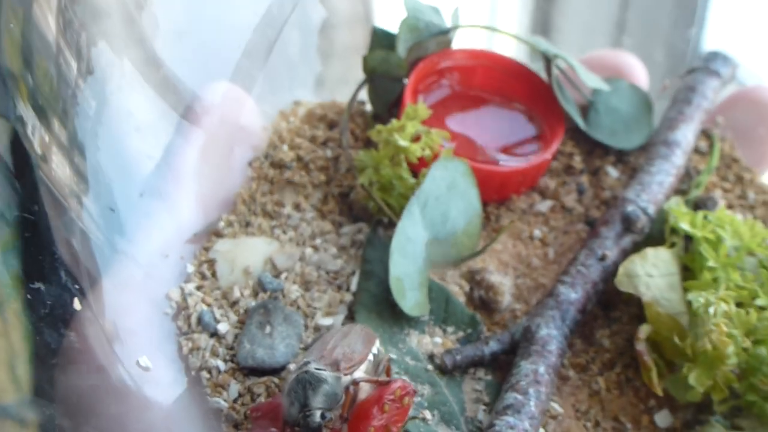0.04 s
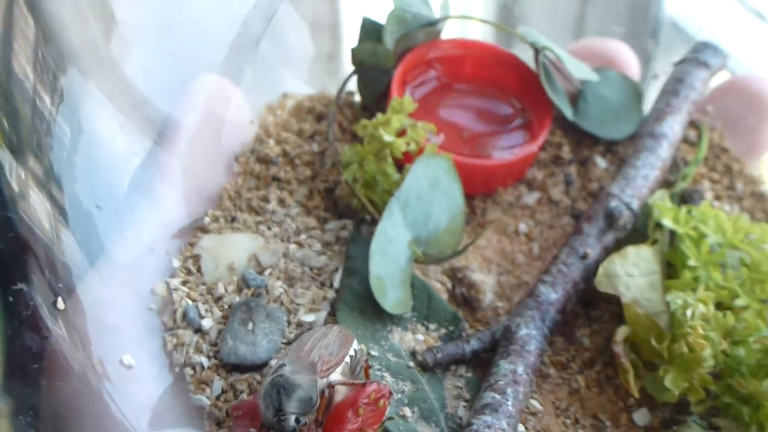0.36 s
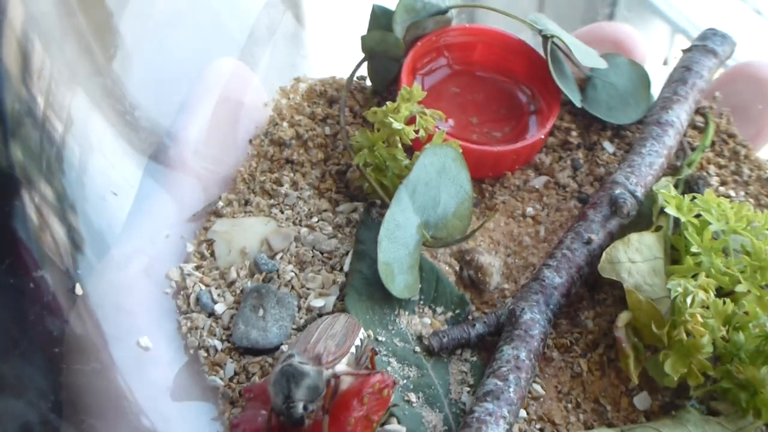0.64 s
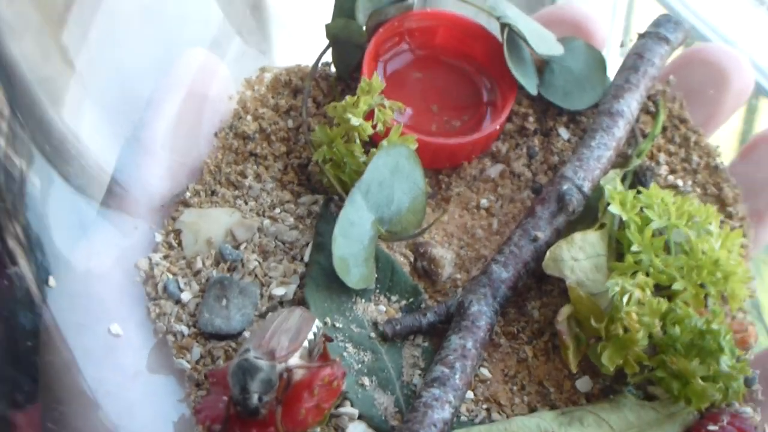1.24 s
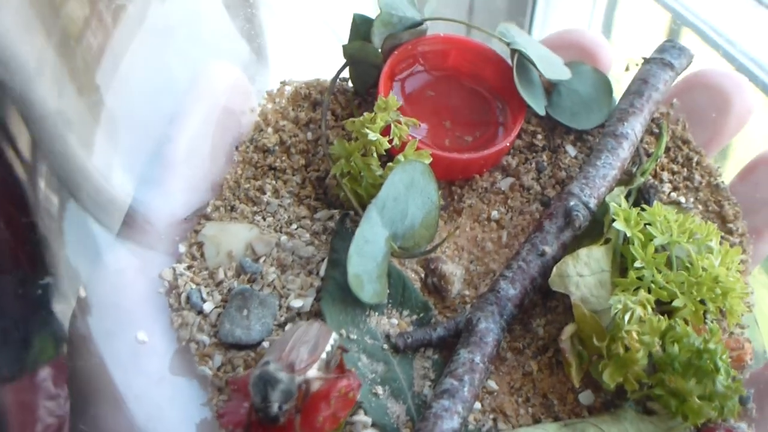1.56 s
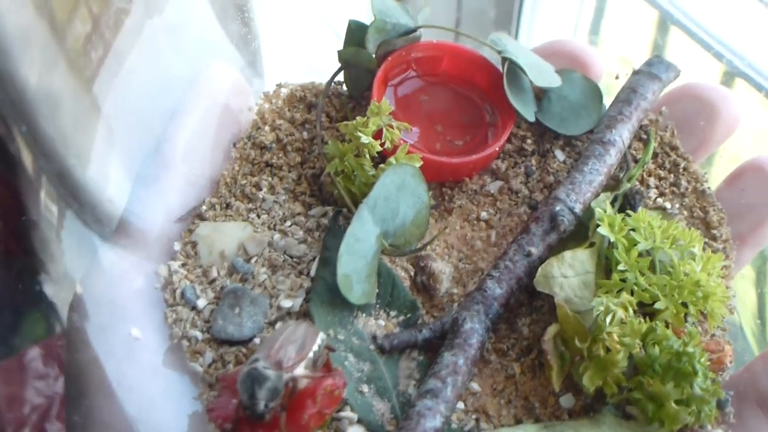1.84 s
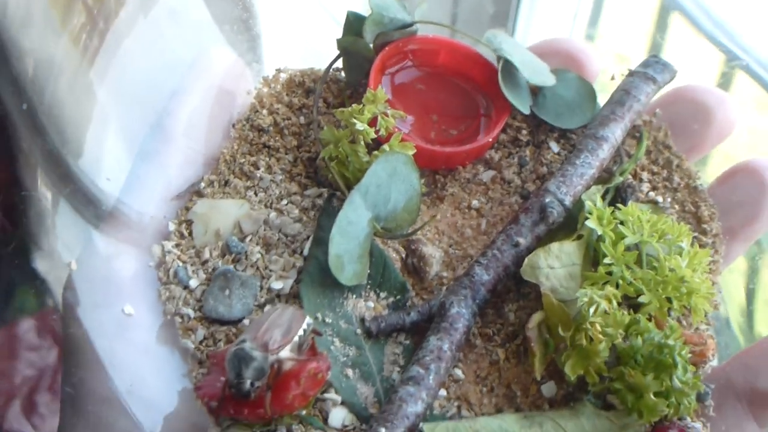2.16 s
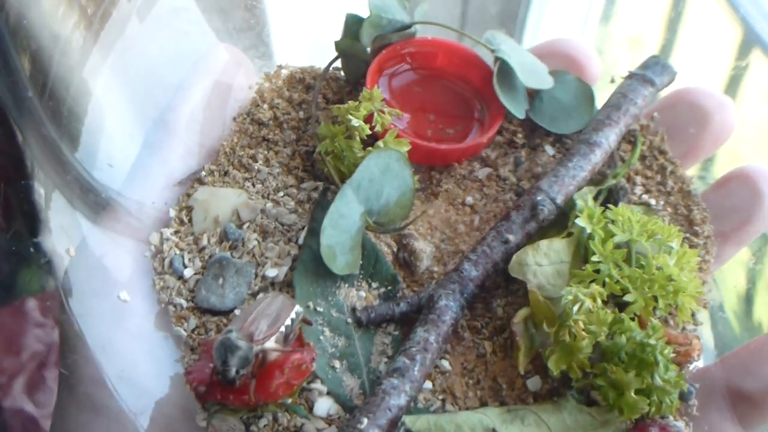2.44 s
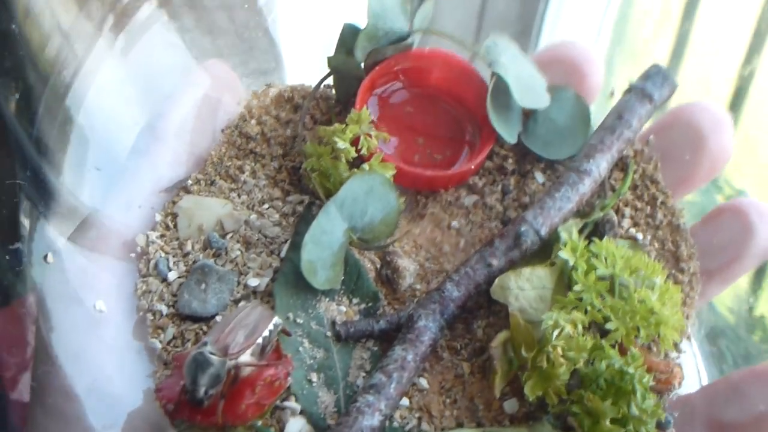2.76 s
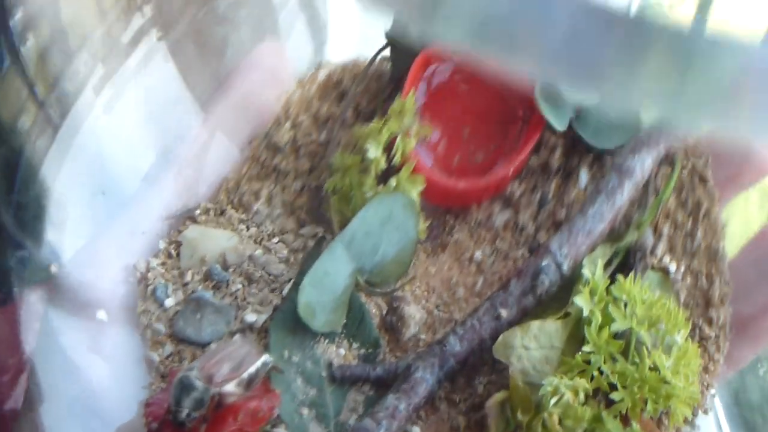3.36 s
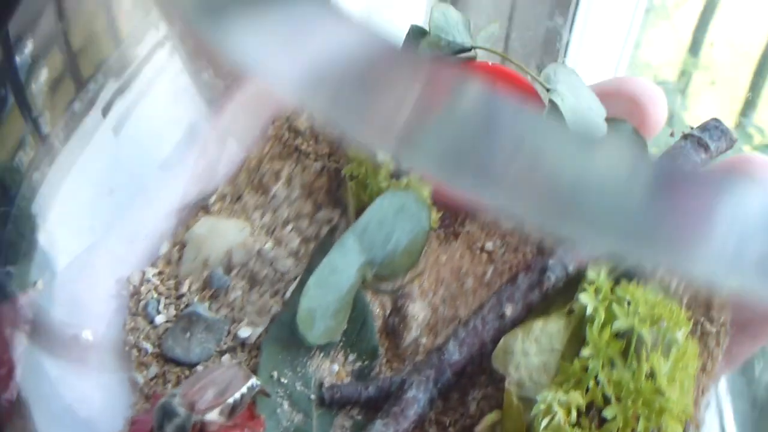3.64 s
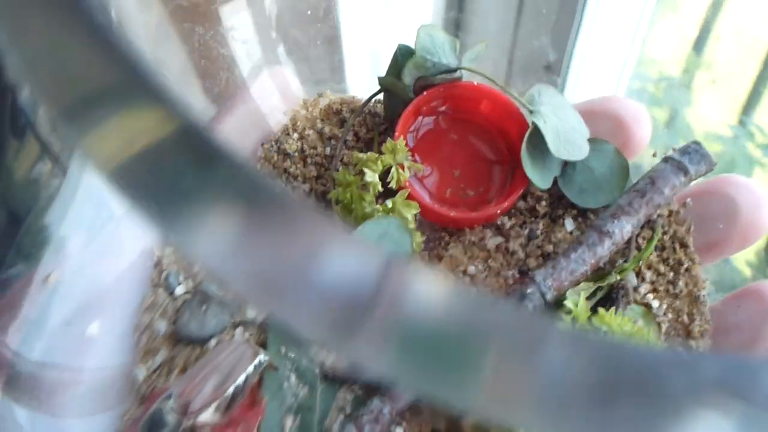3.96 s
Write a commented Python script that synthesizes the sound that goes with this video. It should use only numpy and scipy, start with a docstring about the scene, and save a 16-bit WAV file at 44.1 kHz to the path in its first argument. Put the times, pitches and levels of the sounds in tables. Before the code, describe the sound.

A small bird gives a thin pulsing whistle, pauses, then makes two raspy chips and a louder run of six falling notes. The calls echo slightly in a small room, over a low rumble and soft hiss.

```python
"""A small bird calls with both sides of its voice box at once, in the echo of a small room by a window.
Each side is a gliding, fluttering sine. It gives one pulsing whistle, two raspy chips, each followed
by a thin slurred note, then a run of six falling notes. A hand-held glass jar, knocked once lightly,
rings in quickly damped modes. There is one tiny tick; a low rumble, soft hiss and faint hum lie beneath."""
import sys
import numpy as np
from scipy import signal
from scipy.fft import rfft, irfft
from scipy.io import wavfile

SR = 44100
rng = np.random.default_rng(int(sys.argv[2]) if len(sys.argv) > 2 else 0)


def int16_out(signal):
    """Quantize to a 16-bit WAV file."""
    q = np.round(np.clip(np.atleast_2d(signal).T, -1, 1) * 32767)
    wavfile.write(sys.argv[1], SR, q.astype(np.int16))


N = 176400
T = np.arange(N) / SR

# Whistle pulses. Each row: start in seconds, length in seconds, low voice in Hz, its relative level
# in dB, high voice in Hz, its relative level in dB.
WHISTLE_PULSES = [(-0.02, 0.07, 3180, -45.5, 4800, -46.5), (0.066, 0.058, 3195, -41.5, 4795, -48.5),
                  (0.146, 0.06, 3185, -46, 4800, -48), (0.215, 0.075, 3185, -49, 4805, -50.5)]
# Raspy chips. Each row: as in WHISTLE_PULSES.
CHIP_NOTES = [(2.72, 0.052, 3760, -38.5, 5020, -52.5), (2.967, 0.056, 3740, -43, 5000, -54)]
# Slurs, the low voice sinking. Each row: as in WHISTLE_PULSES.
SLUR_NOTES = [(2.803, 0.095, 2475, -51.5, 6440, -61), (3.015, 0.10, 2475, -49, 6460, -58)]
# Near-level tone pairs ending the slurs. Each row: as in WHISTLE_PULSES.
PAIR_NOTES = [(2.822, 0.098, 4265, -48.5, 4600, -53.5), (3.042, 0.092, 4260, -48, 4620, -53)]
# Closing run, the voices drawing apart in each note. Each row: as in WHISTLE_PULSES.
RUN_NOTES = [(3.164, 0.094, 3625, -30.5, 5200, -46), (3.274, 0.084, 3556, -31, 5250, -48),
             (3.394, 0.093, 3485, -33.5, 5314, -48.5), (3.507, 0.087, 3495, -32.5, 5320, -49.5),
             (3.647, 0.0847, 3480, -32.5, 5390, -50), (3.767, 0.081, 3471, -32, 5384, -50)]
# Tone colour of the closing run, a little softer near 3750 Hz. Each row: frequency in Hz, gain in dB.
RUN_COLOUR = [(3000, 1), (3290, 0), (3400, 0.5), (3750, -5.5), (4050, -2), (4800, -3), (14000, -0.5)]


def bird():
    """The whole phrase, each kind of note with its own glide and roughness."""
    whistle = voice_box(WHISTLE_PULSES, attack=(0.25, 0.6), release=0.35, fall=0.008, rise=0.002,
                        waver=(0.008, 0.009), waver_hz=80, rasp=0.019, flutter_db=2.8, overtone_db=-29)
    chips = voice_box(CHIP_NOTES, attack=(0.35, 0.32), release=0.55, fall=-0.012, rise=0.007,
                      waver=(0.046, 0.04), waver_hz=200, rasp=0.026, flutter_db=-2, overtone_db=-19)
    slurs = voice_box(SLUR_NOTES, attack=(0.5, 0.68), release=0.35, fall=0.21, rise=0.014, bend=0.45,
                      waver=(0.018, 0.008), waver_hz=200, rasp=0.023, flutter_db=7, overtone_db=-20)
    pairs = voice_box(PAIR_NOTES, attack=(0.4, 0.42), release=0.25, fall=0.007, rise=0.01,
                      waver=(0.004, 0.007), waver_hz=120, rasp=0.017, flutter_db=-2, overtone_db=-35)
    run = voice_box(RUN_NOTES, attack=(0.2, 0.11), release=0.39, fall=0.108, rise=0.05, bend=1.8,
                    waver=(0.007, 0.01), waver_hz=130, rasp=0.001, flutter_db=3.5, overtone_db=-18.5)
    return whistle + chips + slurs + pairs + coloured(run, RUN_COLOUR)


def voice_box(notes, attack, release, fall, rise, waver, waver_hz, rasp, flutter_db, overtone_db, bend=1):
    """Two gliding sines a note, mixing into a faint overtone. attack and waver are (low, high) pairs.
    attack and release are shares of the note; fall, rise, waver and rasp are shares of the pitch."""
    out = np.zeros(N)
    low_wobble = waver[0] * drift(waver_hz) + rasp * drift(570)
    high_wobble = waver[1] * drift(waver_hz)
    low_flutter = unit_rms(from_db(flutter_db * drift(95)))
    high_flutter = unit_rms(from_db(flutter_db * drift(95)))
    for start_s, length_s, low_hz, low_db, high_hz, high_db in notes:
        progress = (T - start_s) / length_s
        on = (progress > 0) & (progress < 1)
        progress = progress[on]
        low_glide = 1 - fall * (progress ** bend - 0.5 ** bend)
        high_glide = 1 + rise * (progress - 0.5)
        low_phase = 2 * np.pi / SR * np.cumsum(low_hz * (low_glide + low_wobble[on]))
        high_phase = 2 * np.pi / SR * np.cumsum(high_hz * (high_glide + high_wobble[on]))
        low_gain = from_db(low_db) * ease(progress / attack[0]) * low_flutter[on]
        high_gain = from_db(high_db) * ease(progress / attack[1]) * high_flutter[on]
        overtone = from_db(overtone_db) * np.sin(low_phase + 2 * high_phase)
        voices = low_gain * np.sin(low_phase) + high_gain * (np.sin(high_phase) + overtone)
        out[on] += np.sqrt(2) * ease((1 - progress) / release) * voices
    return out


def room(x, early_hold_s=0.05, early_t60_s=0.17, tail_t60_s=0.37, direct_db=-7):
    """Direct sound, a burst of close reflections and a short tail, different at each ear."""
    t = T[:SR // 2]
    noise = rng.standard_normal((2, 2, len(t)))
    early = noise[0] * from_db(-60 * np.maximum(t - early_hold_s, 0) / early_t60_s)
    tail = noise[1] * from_db(-60 * t / tail_t60_s)
    response = (unit_rms(early) + unit_rms(tail)) / np.sqrt(len(t))
    response[:, 0] += from_db(direct_db)
    response = unit_rms(response) / np.sqrt(len(t))
    return signal.fftconvolve(x[None], response, axes=1)[:, :N]


# Modes of the held jar. Each row: frequency in Hz, relative level in dB, T60 in seconds.
JAR_MODES = [(330, -4, 0.035), (560, -1, 0.035), (820, 0, 0.028), (1150, -3, 0.016), (1720, -2, 0.016),
             (2300, 2, 0.016), (2900, 2, 0.012)]


def jar_knock(start_s=3.4658, gain_db=-43):
    """One light touch on the jar; the hand damps its modes at once."""
    age_s = np.maximum(T - start_s, 0)
    return sum((-1) ** k * from_db(gain_db + db - 60 * age_s / t60_s) * np.sin(2 * np.pi * hz * age_s)
               for k, (hz, db, t60_s) in enumerate(JAR_MODES))


def tick(start_s=1.8235, level_db=-51, t60_s=0.018, band_hz=(1800, 6500)):
    """A tiny dry tick of fast-decaying band noise."""
    age_s = T - start_s
    bandpass = signal.butter(1, band_hz, "band", fs=SR, output="sos")
    noise = unit_rms(signal.sosfilt(bandpass, rng.standard_normal(N)))
    return from_db(level_db - 60 * np.maximum(age_s, 0) / t60_s) * (age_s > 0) * noise


# Noise common to both ears. Each row: frequency in Hz, relative density in dB.
MID_SPECTRUM = [(15, -50), (25, -91), (37, -11), (86, -6.5), (119, -4), (152, -2.5), (198, -4.5), (233, 0),
                (289, -4), (537, -7.5), (762, -12), (1020, -14.5), (1140, -12.5), (1270, -17), (3090, -21),
                (7910, -23.5), (15500, -29)]
# Noise opposite at the two ears. Each row: frequency in Hz, relative density in dB.
SIDE_SPECTRUM = [(15, -56), (25, -51), (46, -10.5), (140, 2), (198, 0.5), (253, 4), (389, 5), (537, 4),
                 (945, 2.5), (3720, -6.5), (4040, -7), (5010, -10), (5730, -11), (15500, -22.5)]
# Hum tones. Each row: frequency in Hz, level before the swell in dB.
HUM_TONES = [(100, -67.5), (243, -67)]
# Slow background swell. Each row: time in seconds, gain in dB.
SWELL = [(0, -1), (0.6, -1.5), (1.25, 0.3), (1.6, -1.5), (2.2, -1.5), (2.6, -1), (3.3, -0.7), (4, -1)]


def background(mid_db=-51, side_db=-49):
    """Low rumble, hiss and a wavering hum, swelling slowly together."""
    mid = from_db(mid_db) * unit_rms(coloured(rng.standard_normal(N), MID_SPECTRUM))
    side = from_db(side_db) * unit_rms(coloured(rng.standard_normal(N), SIDE_SPECTRUM))
    for hz, db in HUM_TONES:
        phase = 2 * np.pi * hz * T
        mid += from_db(db) * (drift(1.84) * np.sin(phase) + drift(0.89) * np.cos(phase))
    swell = from_db(np.interp(T, *np.transpose(SWELL)))
    return np.array([mid + side, mid - side]) * swell


def from_db(db):
    """Decibels to gain."""
    return 10 ** (np.asarray(db) / 20)


def unit_rms(x):
    """Scale to unit power."""
    return x / np.sqrt(np.mean(x ** 2) + 1e-20)


def ease(x):
    """Quarter-sine rise from 0 to 1, then held."""
    return np.sin(np.pi / 2 * np.minimum(x, 1))


def drift(rate_hz):
    """Unit-power random wander: noise through two low-pass poles at rate_hz."""
    pole = np.exp(-2 * np.pi * rate_hz / SR)
    wander = signal.lfilter([1], [1, -2 * pole, pole * pole], rng.standard_normal(2 * N))
    return unit_rms(wander[N:])


def coloured(x, spectrum):
    """Filter by a curve of (Hz, dB) points."""
    hz, db = np.transpose(spectrum)
    bin_hz = np.maximum(np.arange(N // 2 + 1) * SR / N, 1)
    gain = from_db(np.interp(np.log(bin_hz), np.log(hz), db))
    return irfft(rfft(x) * gain, N)


def scene(bird_gain_db=3.6, pan_db=1.7):
    """The bird a little to the left, over the background, knock and tick."""
    ear_gains = from_db(bird_gain_db + pan_db * np.array([[1], [-1]]))
    return room(bird()) * ear_gains + background() + jar_knock() + tick()


def record(dry, cutoff_hz=15750):
    """Steep low-pass on the top treble."""
    return signal.sosfilt(signal.ellip(12, 0.1, 80, cutoff_hz, fs=SR, output="sos"), dry)


dry = scene()
out = record(dry)
int16_out(out)
```